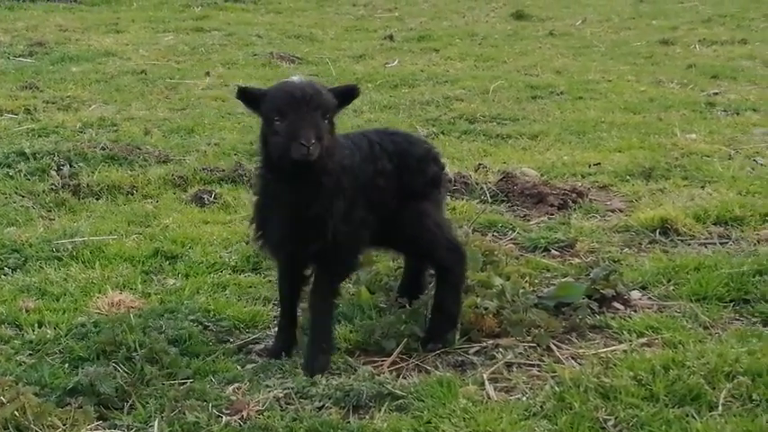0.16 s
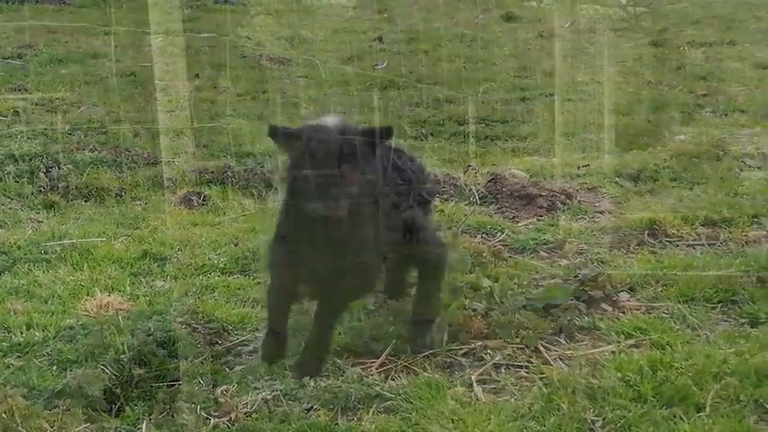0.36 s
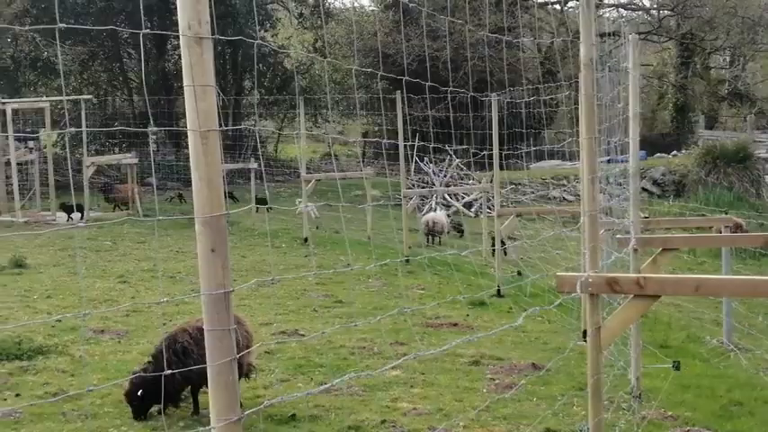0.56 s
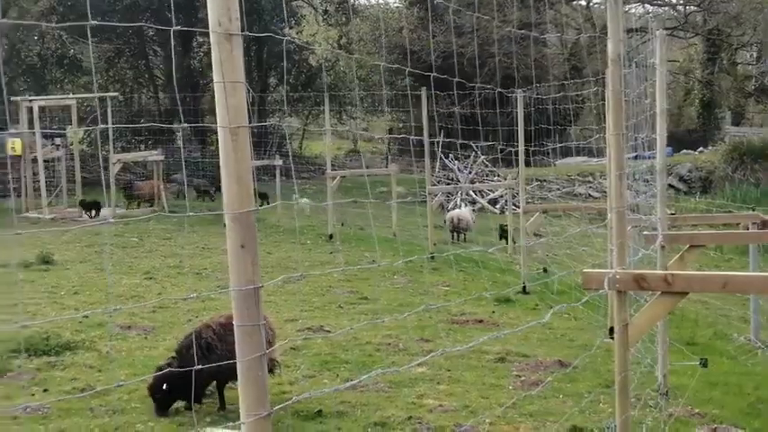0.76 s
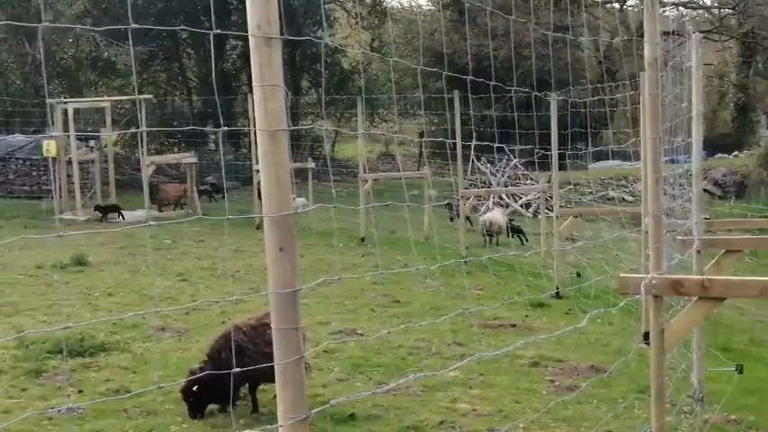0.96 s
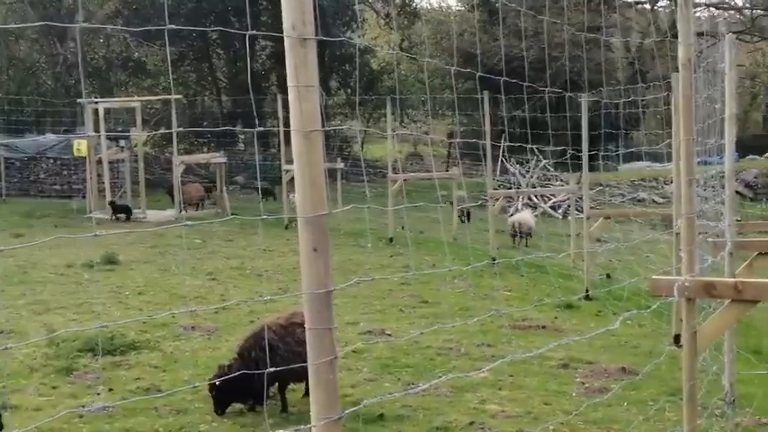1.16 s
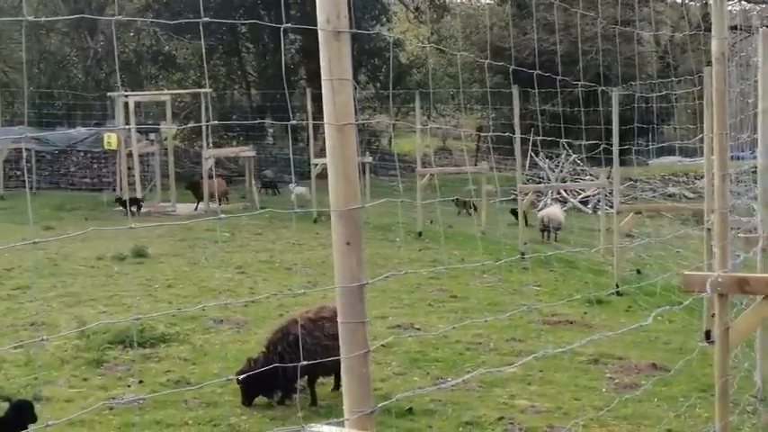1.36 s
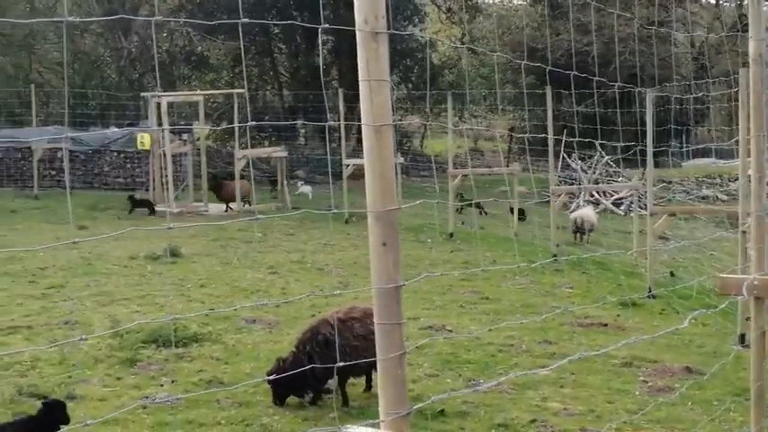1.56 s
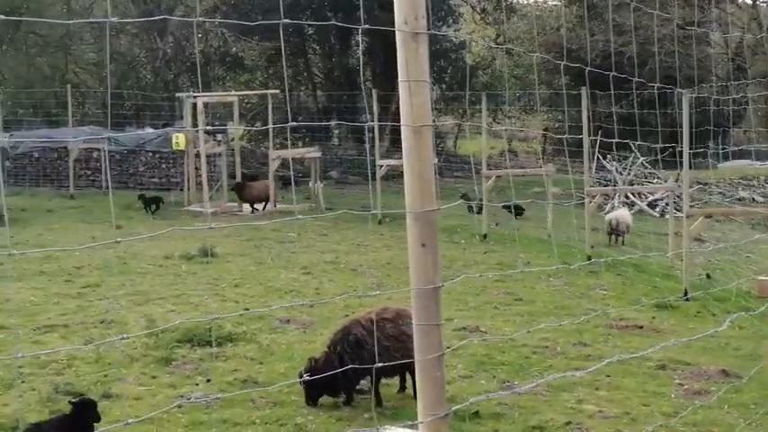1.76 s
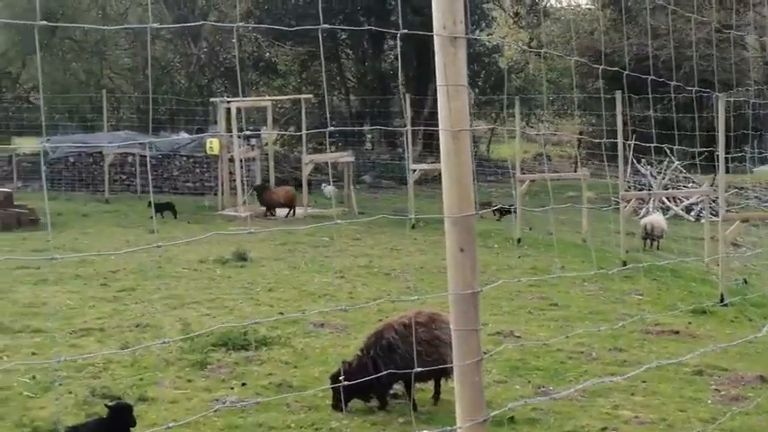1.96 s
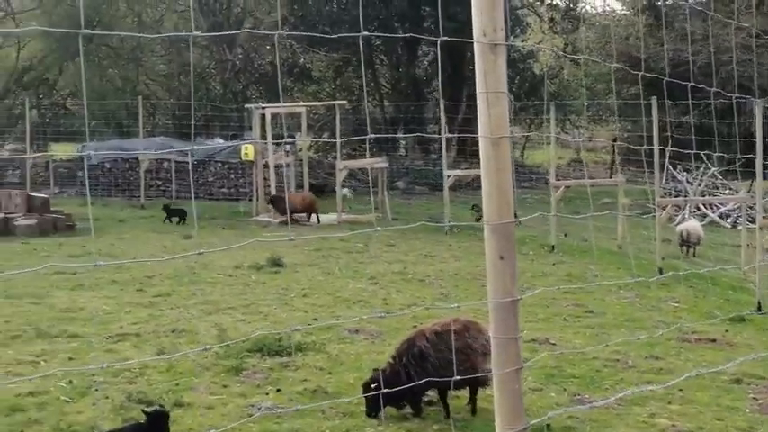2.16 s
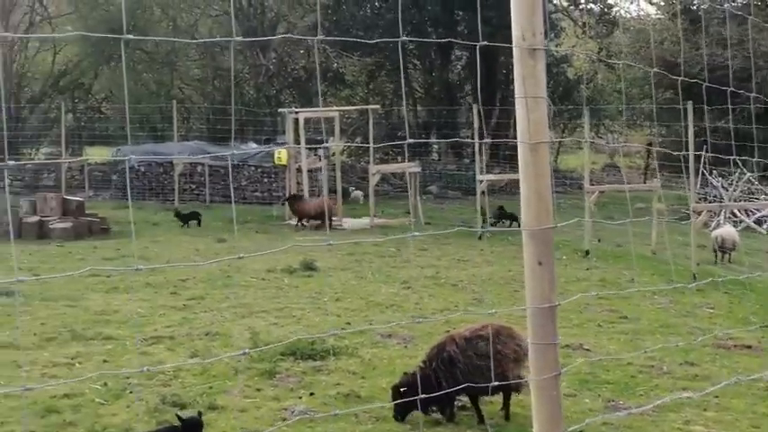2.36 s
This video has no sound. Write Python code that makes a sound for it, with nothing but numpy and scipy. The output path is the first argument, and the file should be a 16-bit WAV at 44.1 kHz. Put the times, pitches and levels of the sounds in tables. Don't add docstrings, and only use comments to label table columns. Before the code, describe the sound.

Single near bleat from a young lamb, rapidly pulsing and slightly raspy, begins almost at once and stops by one second. Afterwards, outdoor air noise, low bumps on the microphone, thin bird chirps and dim distant flock calls.

```python
import sys
import numpy as np
from scipy import signal
from scipy.fft import rfft, irfft, next_fast_len
from scipy.io import wavfile
from scipy.ndimage import uniform_filter1d, map_coordinates

SR = 44100
rng = np.random.default_rng(int(sys.argv[2]) if len(sys.argv) > 2 else 0)


def undo_db(level):
    steps = np.asarray(level, float) / 20
    return 10 ** steps


def unload_wav(signal):
    wavfile.write(
        sys.argv[1],
        SR,
        np.round(np.clip(np.atleast_2d(signal).T, -1, 1) * 32767).astype(np.int16),
    )


N = 112455
T = np.arange(N) / SR


def unit(x):
    return x / np.sqrt(np.mean(np.abs(x) ** 2) + 1e-20)


def curves(rows, t):
    s, *cols = np.transpose(rows)
    return [np.interp(t, s, c) for c in cols]


def bump(t, s, width):
    return np.exp(-.5 * ((t - s) / width) ** 2)


def wobble(rate, size, count=1):
    knots = rng.standard_normal((count, size // 40 + 4))
    places = np.arange(size) * min(rate, 1000) / SR
    return np.array([map_coordinates(k, [places]) for k in knots])


def filtered(x, response):
    m = next_fast_len(N + 8192)
    return irfft(rfft(x, m) * response(np.fft.rfftfreq(m, 1 / SR)), m)[:N]


def peak(f, hz, width):
    return 1j * f * width / (hz * hz - f * f + 1j * f * width)


def echoed(x, db, t60):
    tail = rng.standard_normal(SR // 2) * undo_db(-60 * T[:SR // 2] / t60)
    delayed = np.pad(x, (300, 0))
    return x + undo_db(db) * signal.fftconvolve(delayed, tail / np.linalg.norm(tail))[:N]


def whistle(hz, gain):
    return np.sqrt(2) * gain * np.sin(2 * np.pi * np.cumsum(hz) / SR)


def patchy(response, patchy_db):
    z = signal.stft(rng.standard_normal(N + 512), nperseg=512)[2]
    patches = uniform_filter1d(uniform_filter1d(rng.standard_normal(z.shape), 4, 0), 8, 1)
    noise = signal.istft(z * undo_db(patchy_db * unit(patches)), nperseg=512)[1][:N]
    return unit(filtered(noise, response))


def field():
    # (frequency [Hz], level [dB per Hz])
    air_colour = [(60, -26), (130, -2.5), (260, 3), (590, -1.5), (1200, -10.5), (3270, -9.5), (4090, -21.5),
                  (5720, -15), (7700, -23)]
    # (frequency [Hz], width [Hz], level [dB])
    flock_peaks = [(656, 525, 0), (3160, 930, -2)]
    # (time [s], air [dB], flock [dB], far birds [dB], rumble [dB])
    bed_levels = [(0, -53.5, -59, -85.5, -65.5), (.4, -52.5, -51.5, -59, -64.5),
                  (1.05, -53, -59.5, -58.5, -70.5), (1.3, -51.5, -56.5, -55, -74),
                  (1.6, -51, -55.5, -55.5, -71.5), (2.0, -57, -54, -56, -64.5),
                  (2.55, -51, -59, -55.5, -70)]
    # (time [s], level [dB])
    air_hollow = [(0, -4.5), (.3, -0.5), (1.2, 1.5)]
    air_db, flock_db, birds_db, rumble_db = curves(bed_levels, T)
    f, v = np.transpose(air_colour)
    air = patchy(lambda hz: undo_db(np.interp(np.log(hz + 1), np.log(f), v)), patchy_db=.8)
    flock = patchy(lambda hz: sum(undo_db(db) * np.abs(peak(hz, c, w)) ** 2 for c, w, db in flock_peaks),
                   patchy_db=1.5)
    birds = patchy(lambda hz: np.abs(peak(hz, 5754, 1600)) ** 2, patchy_db=1.5)
    hollow = filtered(air, lambda hz: np.abs(peak(hz, 1500, 900)) ** 2)
    air = air + (undo_db(curves(air_hollow, T)[0]) - 1) * hollow
    rumble = patchy(lambda hz: np.abs(peak(hz, 76, 180)) ** 2, patchy_db=-2.5)
    gusty_db = air_db + 2.4 * wobble(10.72, N)[0]
    lumpy_db = rumble_db - 7.5 * wobble(9.9, N)[0]
    return undo_db(gusty_db) * air + undo_db(flock_db) * flock + undo_db(birds_db) * birds + undo_db(lumpy_db) * rumble


def far_lamb(call):
    # (multiple of the pitch, level [dB])
    far_partials = [(3, 3), (7, -15), (8, -14), (9, -10), (10, -1), (11, 0)]
    hz, db, lift_db = curves(call, T)
    hz = hz * (1 + .004 * wobble(25, N)[0])
    db = db + 2 * np.sin(2 * np.pi * 10 * T)
    blur = 1 + .35 * wobble(40.2, N, count=6)
    out = np.zeros(N)
    for (k, level), b in zip(far_partials, blur):
        tilt = (6 < k < 10) - (k == 3)
        out += whistle(k * hz, undo_db(db + level + lift_db * tilt) * b)
    return echoed(out * (T >= call[0][0]) * (T <= call[-1][0]), -9, .3)


def throat_motion(t):
    # (core start [s], core length [s], level [dB], lead-in [s])
    openings = [(0.2133, .027, -21, 0.02), (.2865, .029, -21, 0.016), (.363, .026, -22.5, 0.016),
                (0.44, 0.02567, -24, .02), (.5165, .026, -22.5, 0.022), (0.595, .038, -23, 0.021),
                (0.674, .037, -22, .018), (0.758, 0.0247, -22, .017), (0.843, 0.024, -23.5, .026),
                (0.92, 0.026, -24.5, .019), (0.979, .011, -32, 0.024)]
    # (top [Hz], end [Hz])
    arches = [(229, 233), (229.5, 223), (231, 225), (231, 224), (231, 223), (231, 213), (230, 230),
              (230, 229), (227, 224), (228, 230), (229, 228)]
    rise_s, snap_s, shut_s, tail_s = .004, .0031, .0061, .012
    gap_db, dome_db = -29.5, 3.5
    lead_flat, onset_flat = .09, .035
    shape = []
    for (s, d, db, lead), (top, end) in zip(openings, arches):
        late_s = s - .66
        sharp = .27 * max(late_s, -2 * lead_flat)
        flat_hz = top * (1 - lead_flat)
        shut = s + d + shut_s
        shape += [(s - lead - rise_s, gap_db, db, flat_hz),
                  (s - lead, -13, db, flat_hz),
                  (s - snap_s / 2, -6.5, db, top * (1 - 2 * onset_flat)),
                  (s + snap_s / 2, -dome_db, db, top * (1 - onset_flat / 2)),
                  (s + d * .4, 0, db, top),
                  (s + d, -dome_db, db, end),
                  (shut, -19, db, end * (1 + sharp / 2)),
                  (shut + tail_s, -17 + 11 * late_s, db, end * (1 + sharp))]
    first = (shape[0][0] - .008, -60, *shape[0][2:])
    last = (shape[-1][0], -60, *shape[-1][2:])
    shape = [first] + sorted(shape)[:-1] + [last]
    return uniform_filter1d(curves(shape, t), size=200, axis=1)


def throat_response(f, effort_db, weak, t):
    # (frequency [Hz], width [Hz], level [dB])
    resonances = [(890.8, 114, 0), (2250, 310, -3.5), (2828, 257, -6.5), (3187, 285, -9),
                  (6000, 680, -22.5), (6600, 1280, -24)]
    # (time [s], second resonance scale, its level [dB], fourth [dB], top ones [dB],
    # rise as the throat shuts [share])
    mouth = [(.19, 0.97, 0, 2, 2.5, 0.09), (.4, 1.016, 1.5, 2.5, -3.5, .05), (.56, 1.078, 2, -9, -6, 0.18),
             (.64, 0.95, -2, 2, -11, 0.42), (.72, 1.047, -0.5, -4.5, -11, 0.3),
             (.8, 1.01, -7.5, 1.5, -9, 0.063), (1.0, 0.98, -2, 5.5, -11, 0.035)]
    # (time [s], width [s], depth [dB])
    chokes = [
        (.225, 0.0052, 6.5),
        (0.301, 0.0032, 18.5),
        (0.379, 0.0027, 15),
        (0.535, 0.0026, 4.5),
        (.613, 0.0032, 10.5),
        (.632, 0.0053, 16.5),
        (0.989, 0.016, 14),
    ]
    # (time [s], width [s], level [dB])
    flares = [
        (0.552, 0.0062, -23.5),
        (0.629, 0.0069, -20),
        (0.649, 0.0065, -23),
        (0.805, 0.006, -37.5),
        (.972, 0.011, -26),
    ]
    # (multiple of the pitch, level [dB])
    nasal_trim = [(2, -2.5), (3, 6), (5, -13), (6, -6.5), (7, -1), (8, -1.5)]
    scale, second_db, fourth_db, top_db, rise = curves(mouth, t)
    choke_db = sum(db * bump(t, s, w) for s, w, db in chokes)
    lift = 1 + np.clip(rise, 0, .18) * weak
    wander = 1 + .025 * wobble(45, len(t), count=3)
    gains = np.array([-2 * weak, second_db, (second_db + fourth_db) / 2, fourth_db + 5 * weak, top_db, top_db])
    gains = gains - choke_db * (np.arange(6) > 0)[:, None]
    moves = [1, scale * wander[0], lift * wander[1], lift * wander[2], 1, 1]
    response = 0
    for i, ((hz, width, db), gain, move) in enumerate(zip(resonances, gains, moves)):
        p = peak(f, hz * move, width)
        response = response + (-1) ** i * undo_db(db + gain) * p * np.abs(p) ** .953
    flare = sum(undo_db(db - effort_db) * bump(t, s, w) for s, w, db in flares)
    response += flare * peak(f, 3850, 550) ** 2
    for multiple, db in nasal_trim:
        response[round(multiple) - 1] *= undo_db(db)
    response[0] = undo_db(-16.5 + .4 * effort_db)
    return response


def lamb():
    t = T[:round(1.1 * SR)]
    effort_db, level_db, pitch = throat_motion(t)
    weak = uniform_filter1d(np.clip(-effort_db / 20, 0, 1), size=400)
    k = np.arange(1, 35)[:, None]
    f = k * pitch * (1 + .005 * wobble(150, len(t)))
    response = throat_response(f, effort_db, weak, t)
    rough = (.15 + .4 * weak) * np.clip(f / 2300, 0, 1) ** 2 * (k > 1)
    rough = np.maximum(rough, .12 * np.clip(2 * weak, 0, 1) ** 2 * (k > 1))
    breath = wobble(200, len(t), count=34) + 1j * wobble(200, len(t), count=34)
    breath = unit(uniform_filter1d(breath, size=2, axis=0))
    smear = np.exp(1j * .7 * (k > 5) * wobble(14, len(t), count=34))
    source = (np.sqrt(1 - rough) + np.sqrt(rough) * breath) * smear
    voice = np.real(response * source * np.exp(2j * np.pi * np.cumsum(f, 1) / SR)).sum(0)
    voice = np.sqrt(2) * voice * undo_db(level_db + effort_db + 0.28 * wobble(88.6, len(t))[0])
    return echoed(np.pad(voice, (0, N - len(t))), -21, .1)


def thuds():
    # (time [s], frequency [Hz], width [s], level [dB])
    puffs = [
        (0.201, 31.6, 0.024, -73),
        (0.519, 60, 0.054, -57.5),
        (0.998, 168, 0.01, -43),
        (1.328, 144.7, 0.017, -44.5),
        (1.552, 108, 0.025, -51),
        (1.649, 118, 0.016, -43),
        (2.36, 89.5, 0.036, -57.5),
        (2.397, 197, 0.02, -54),
        (2.47, 40, 0.0067, -49),
    ]
    out = np.zeros(N)
    for s, hz, w, db in puffs:
        phase = 2 * np.pi * hz * (T - s) + 1.5 * wobble(45, N)[0]
        out += undo_db(db) * bump(T, s, w) * np.sin(phase)
    return out


def bird():
    # (time from its loudest [s], frequency [Hz], level [dB])
    syllable = [(-.051, 5500, -45), (-.046, 5600, -14), (-.043, 6100, -24), (-.039, 6800, -19),
                (-.035, 6600, -38), (-.022, 6280, -31), (-.017, 6130, -40), (-.012, 5980, -22),
                (-.006, 5830, -10), (.003, 5580, 0), (.0065, 5350, -26), (.009, 5250, -12),
                (.014, 5000, -26), (.019, 4700, -19), (.025, 4350, -27), (.029, 4150, -40),
                (.035, 3900, -29), (.042, 3600, -45)]
    # (time [s], level [dB])
    sung = [
        (1.847, -30),
        (1.993, -27.5),
        (2.13, -29),
        (2.268, -29),
    ]
    # (start [s], length [s], from [Hz], to [Hz], level [dB])
    single_notes = [(1.265, 0.011, 5680, 6080, -51), (1.271, 0.019, 6400, 6600, -52.5),
                    (1.35, 0.041, 6000, 5800, -57), (1.405, 0.023, 5600, 5470, -44),
                    (1.416, 0.039, 5490, 5290, -42), (1.505, 0.05, 4480, 4100, -56),
                    (1.282, .025, 5640, 5640, -59), (1.634, 0.037, 7740, 6770, -47),
                    (1.667, 0.031, 6680, 6220, -39.5), (1.699, 0.019, 6450, 6600, -51),
                    (1.721, 0.0166, 6300, 5150, -44.5), (1.729, 0.03, 5080, 3850, -58.5),
                    (2.388, 0.021, 8050, 7150, -47.5), (2.411, 0.1253, 7165, 7020, -41),
                    (2.487, 0.12, 7180, 6780, -46.5), (1.243, 0.0077, 4100, 4150, -56.5),
                    (1.348, .014, 4150, 4120, -64), (1.457, 0.013, 4130, 4070, -52)]
    # (delay [s], length [s], from [Hz], to [Hz], level [dB])
    after_blip = (.007, .01, 5250, 5620, -20)
    out = np.zeros(N)
    for s, db in sung:
        hz, shape_db = curves(syllable, T - s)
        out += whistle(hz, undo_db(db + shape_db) * (np.abs(T - s) < .06) * (shape_db > -44))
    delay, length, blip_from, blip_to, blip_db = after_blip
    blips = [(s + delay, length, blip_from, blip_to, db + blip_db) for s, db in sung]
    for s, d, from_hz, to_hz, db in list(single_notes) + blips:
        u = np.clip((T - s) / d, 0, 1)
        out += whistle(from_hz + (to_hz - from_hz) * u, undo_db(db) * np.sin(np.pi * u) ** .7)
    return echoed(out * undo_db(1.5 * wobble(140, N)[0]), -16, .12)


def scene():
    # (time [s], pitch [Hz], level [dB], lift of the middle partials [dB])
    early_call = [
        (0, 314.5, -67.5, 12),
        (.1, 310, -71.5, 12),
        (.2, 312, -64.5, 11),
        (.4, 297, -94, 6),
    ]
    late_call = [(1.3, 305, -80, 0), (1.62, 312, -64, 0), (1.74, 320, -60, 0), (1.9, 320, -60, 0),
                 (2.03, 318, -60, 5), (2.17, 314, -62, 6), (2.24, 308, -62, 8), (2.275, 296, -64, 10),
                 (2.36, 298, -64, 10), (2.41, 294, -69, 10), (2.55, 290, -80, 8)]
    return (field() + far_lamb(early_call) + lamb() + thuds() + bird() + far_lamb(late_call))[None]


def roll_off(x):
    return signal.sosfilt(signal.butter(12, 7880, fs=SR, output="sos"), x)


def record(dry):
    top_hz, slope_hz = 7490, 139
    x = filtered(dry[0], lambda hz: 1 / (1 + np.exp(np.clip((hz - top_hz) / slope_hz, -50, 50))) ** 2)
    mix = (x + undo_db(-90.0) * rng.standard_normal(N))[None]
    return roll_off(mix)


dry = scene()
out = record(dry)
unload_wav(out)
```